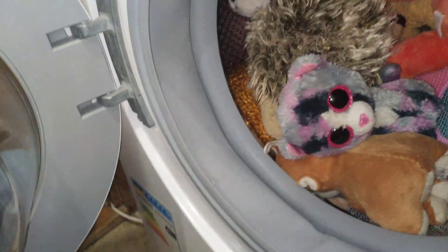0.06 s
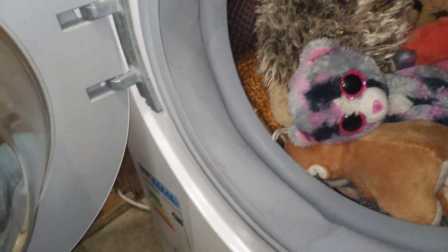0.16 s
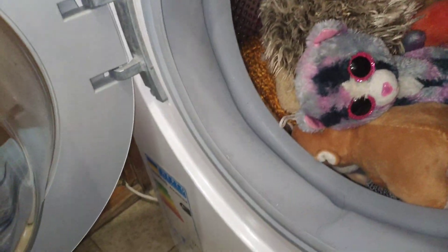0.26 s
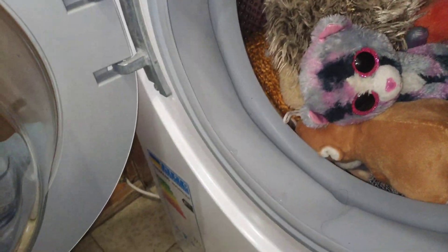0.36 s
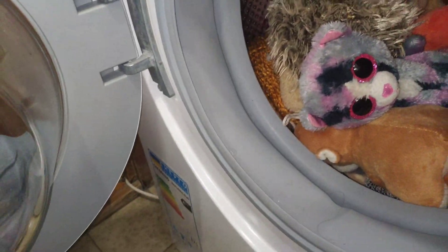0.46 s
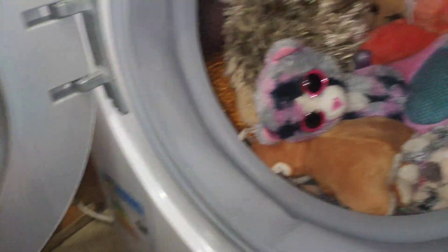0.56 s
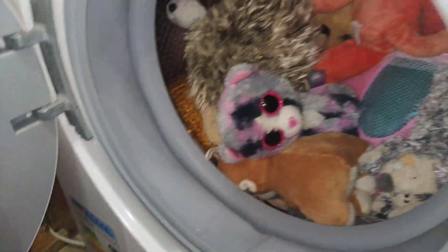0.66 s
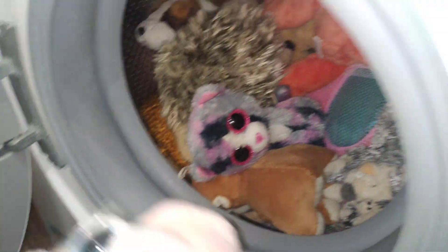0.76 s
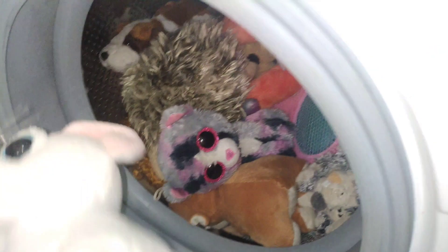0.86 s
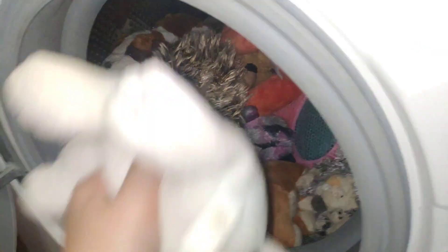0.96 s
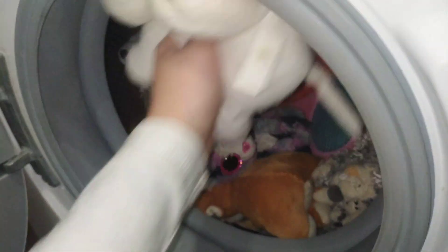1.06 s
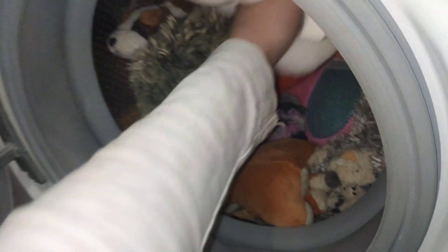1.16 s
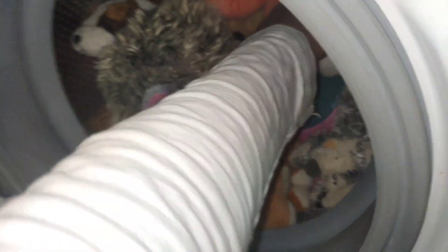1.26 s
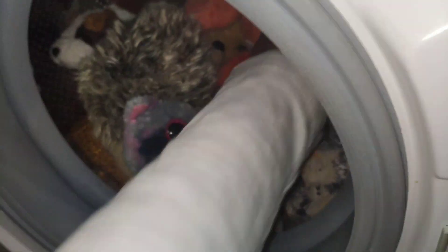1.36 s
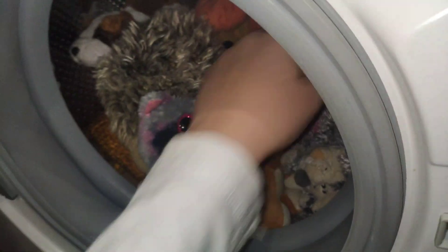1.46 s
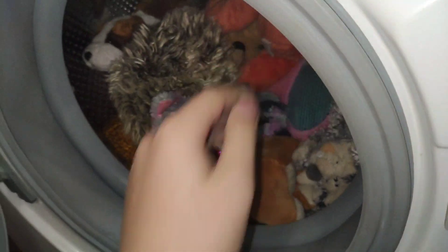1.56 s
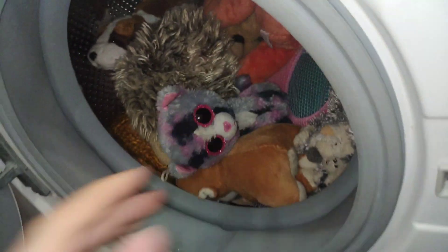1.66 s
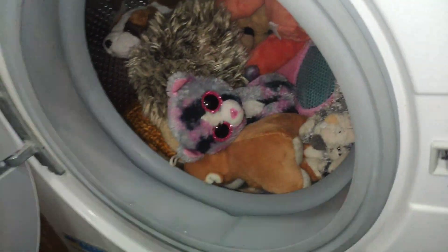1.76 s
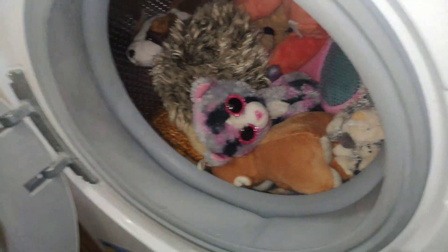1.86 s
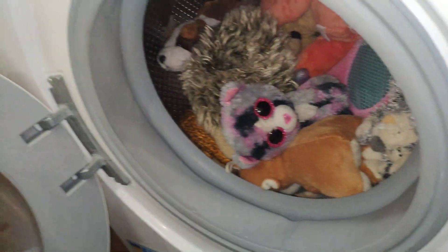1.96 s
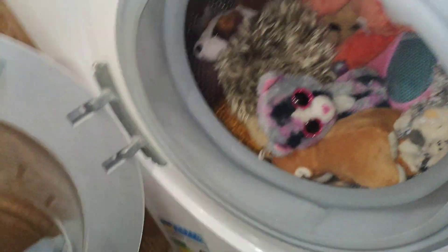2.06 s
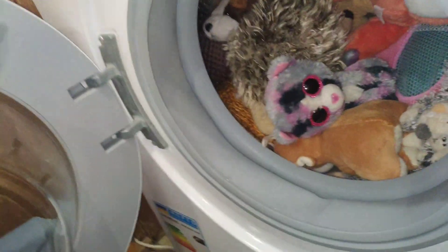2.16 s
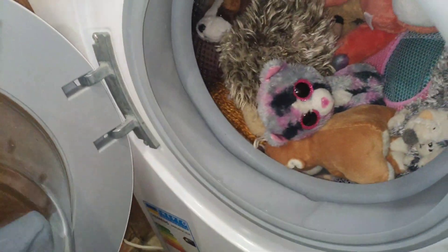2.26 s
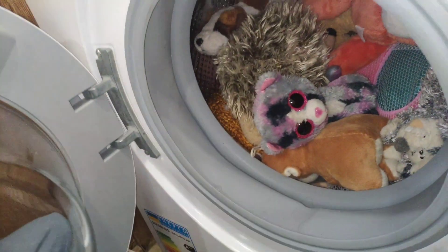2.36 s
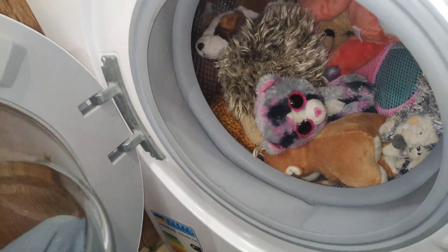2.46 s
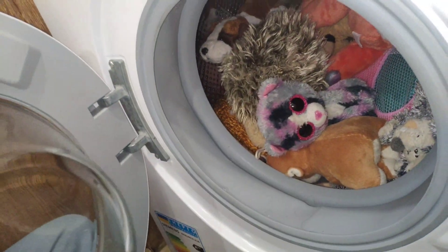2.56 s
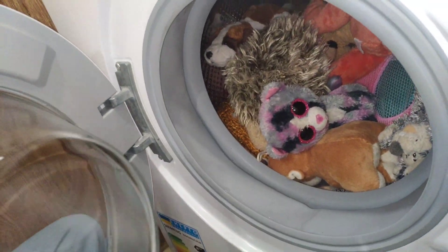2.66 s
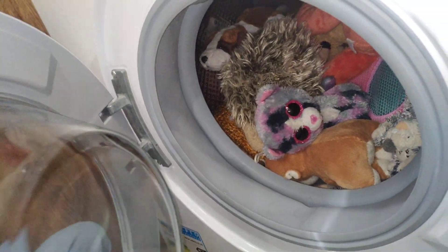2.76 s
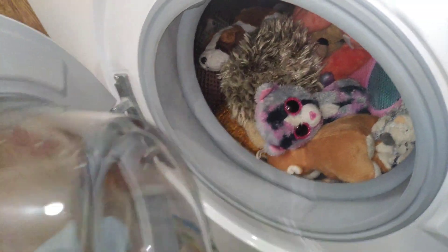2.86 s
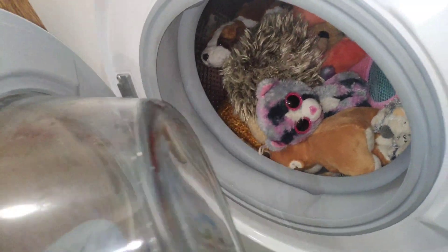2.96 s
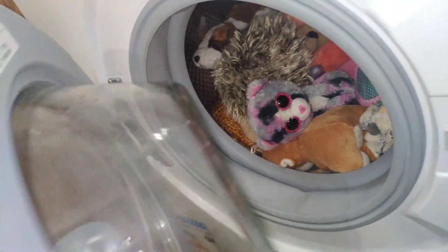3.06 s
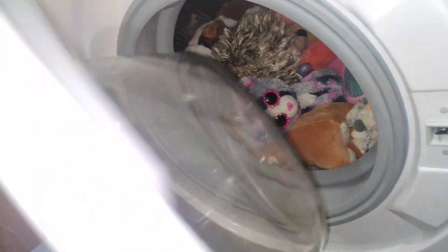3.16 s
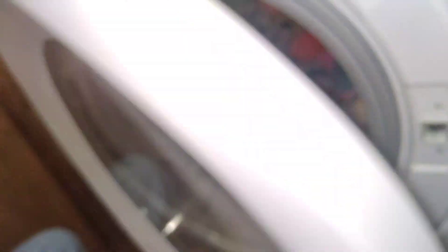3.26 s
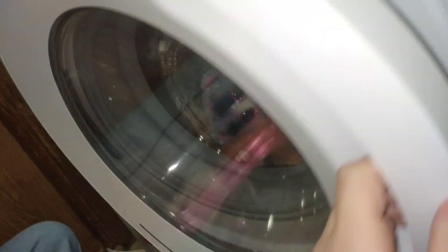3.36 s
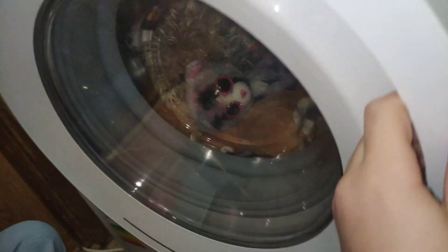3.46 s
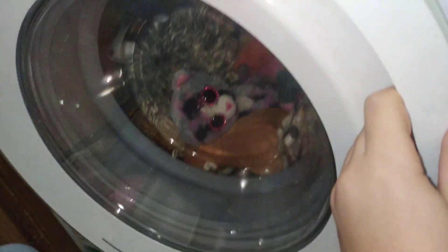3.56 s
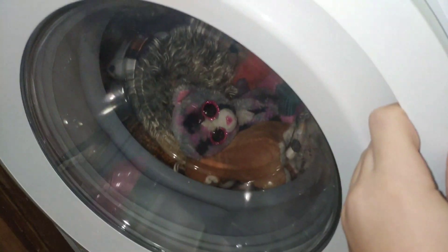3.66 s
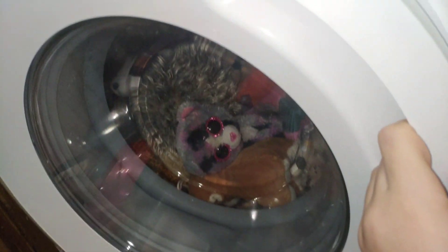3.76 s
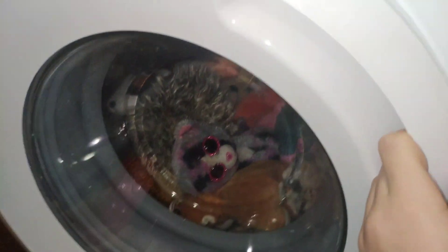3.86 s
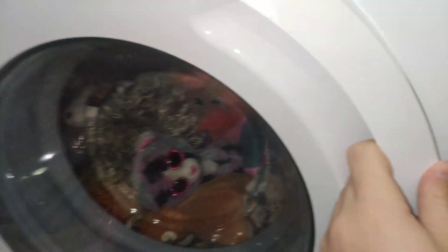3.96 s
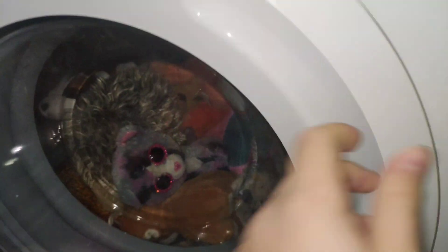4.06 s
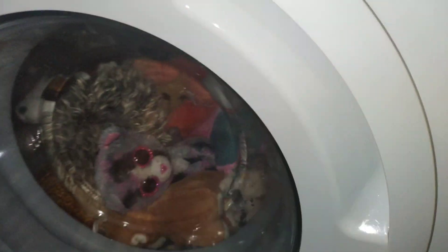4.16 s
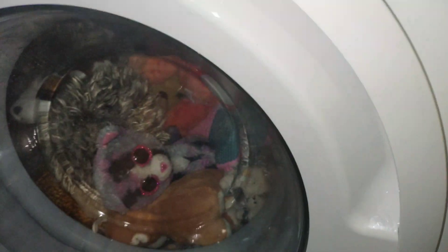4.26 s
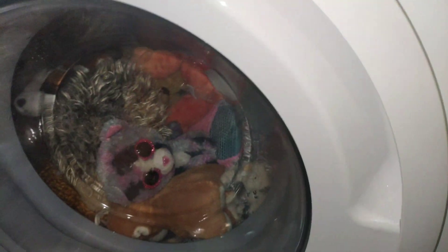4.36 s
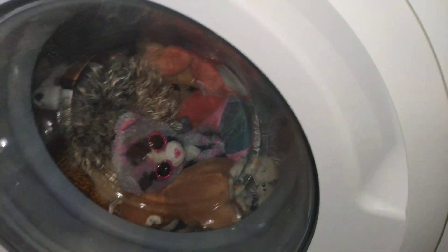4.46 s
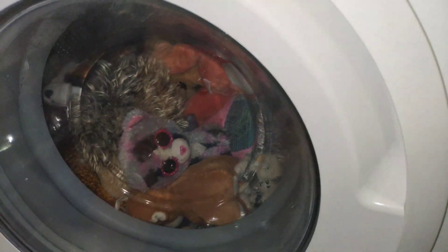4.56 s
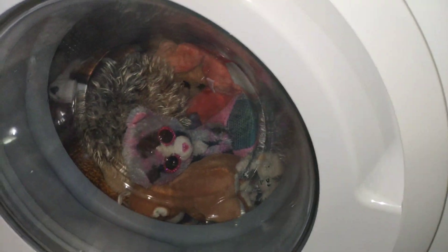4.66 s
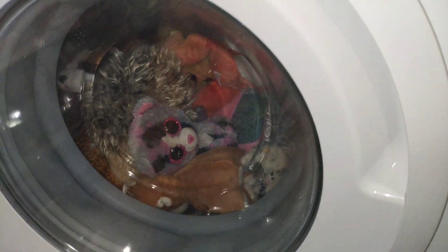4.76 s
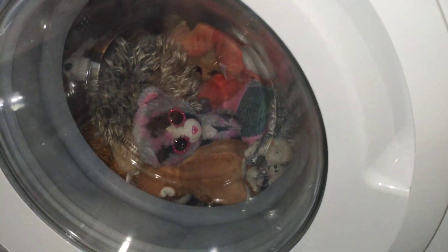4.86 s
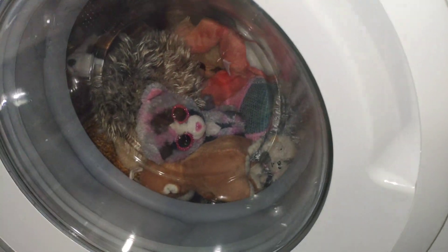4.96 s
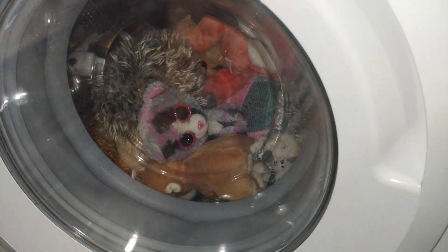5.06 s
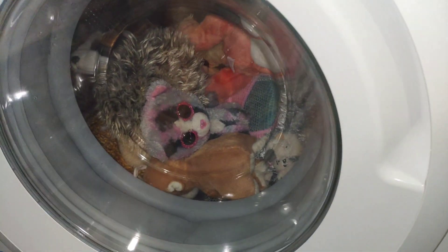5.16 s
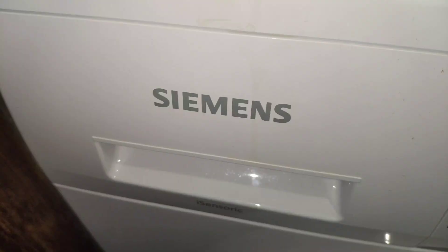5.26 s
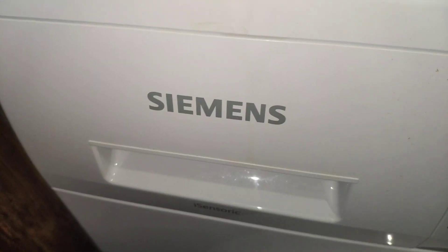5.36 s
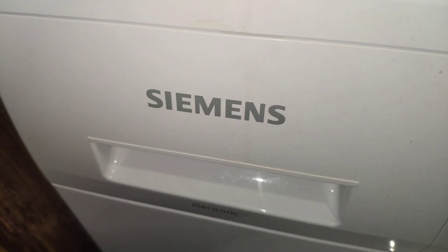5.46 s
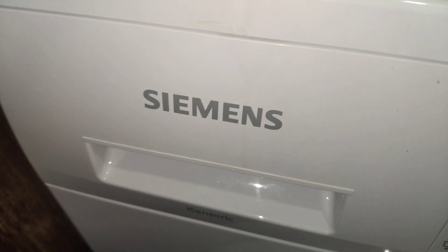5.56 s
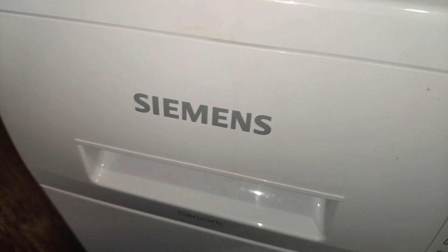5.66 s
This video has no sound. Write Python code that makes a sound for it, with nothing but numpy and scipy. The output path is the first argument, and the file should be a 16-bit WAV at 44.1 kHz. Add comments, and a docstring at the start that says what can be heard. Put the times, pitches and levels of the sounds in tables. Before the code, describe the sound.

An arm stuffs plush toys into a washer drum: quiet rustling, light taps and a short rough scrape. After a hinge click and soft hollow rubbing, the door strikes in two quick steps, snaps metallically and shakes the cabinet. Minor plastic clicks fade into thin room hiss. Phone handling ticks sit close on the right, ending with a strong pop.

```python
"""A washing machine's door swings shut: it bumps on its rubber seal, the latch snaps and the cabinet booms.
Contacts are short coloured noise bursts with damped modes; door and cabinet ring as modes, panels as noise.
Soft toys are loaded first; sleeves and cloth rustle as granular friction noise that follows the arm.
Fingers tick and thump on a hand-held phone, strongest at its right microphone, as cusps of pressure.
A quiet room answers the hard contacts and adds its air noise; the phone's electronics whine thinly."""
import sys
import numpy as np
from scipy import signal
from scipy.fft import rfft, irfft, next_fast_len
from scipy.io import wavfile
from scipy.ndimage import map_coordinates

SR = 44100
rng = np.random.default_rng(int(sys.argv[2]) if len(sys.argv) > 2 else 0)


def log_audio(samples):
    """Write samples as a 16-bit WAV file to the path given in sys.argv[1]."""
    # one column per channel
    frames = np.atleast_2d(samples).T
    # limit to full scale, then quantise
    limited = np.clip(frames, -1, 1)
    pcm = np.round(limited * 32767).astype(np.int16)
    wavfile.write(sys.argv[1], SR, pcm)


N = 251370  # samples, 5.7 s

# All levels are relative: they are set before the room, the microphone balance and the phone's response.
# Hard contacts of door and latch. Each row: start in seconds, level in dB, treble tilt in dB per octave,
# body resonance in Hz, body boost in dB.
CLACKS = [(2.8005, -34.5, -2.5, 686, 22), (2.823, -29, 0.5, 693, 25.5), (2.845, -42, -1, 800, 12),
          (3.582, -35, 5, 3280, 7.5), (3.6037, -16.5, -1.5, 1397, 2), (3.607, -20.5, -1.5, 2304, 8),
          (3.844, -33.5, -2, 951, 10), (3.8484, -17.5, -1.5, 950, 16), (3.868, -22.5, -1, 1000, 1),
          (3.889, -11.5, 4.5, 7130, 3.5), (3.897, -11, 2.5, 1500, 1), (3.9105, -14, -3, 2204, 2),
          (4.037, -27, 1.5, 2394, 9.5), (4.0625, -28, 0, 1700, 11), (4.082, -35.5, -6, 2100, 7)]
# Clear taps of the hand on the plastic rim. Each row: start in seconds, level in dB.
TOUCHES = [(1.596, -46), (1.645, -37.5), (1.949, -45), (2.09, -43), (2.162, -45.5), (2.389, -42.5),
           (2.525, -43.5), (2.54, -43.5), (3.008, -46), (3.0767, -48), (4.32, -47), (4.677, -48),
           (4.78, -52), (4.85, -52.5)]
# The door's weight landing. Each row: start in seconds, then door, cabinet and panel shudder levels in dB.
THUDS = [(3.604, -23, -51.5, -31), (3.628, -42, -43.5, -31), (3.846, -27.5, -37.5, -27.5),
         (3.868, -40.5, -42, -26.5), (3.9107, -30.5, -13, -16)]
# Modes of the glass door on its rubber seal. Each row: frequency in Hz, level in dB, t60 in seconds.
DOOR_MODES = [(77.8, 1, 0.63), (155, -5, .3), (165, -7, 0.67), (228, -15.5, 0.3), (356, -11.5, 0.33),
              (387, -9.5, 0.28)]
# Modes of the steel cabinet and drum. Each row: frequency in Hz, level in dB, t60 in seconds.
CABINET_MODES = [(60.06, -13.5, .45), (100, -21.5, 0.48), (159.9, -4.5, 0.38), (194.4, -2, 0.39),
                 (241.4, -4.5, .22), (262.5, -4, 0.31), (283, -7.5, 0.14), (331.4, -13, .25),
                 (379, -12, .25), (423, -14.5, 0.33), (468, -21, 0.22)]
# Modes of the plastic door frame. Each row: frequency in Hz, level in dB, t60 in seconds.
FRAME_MODES = [(947, -11, 0.085), (1070, -12.5, .13), (1364, -8, 0.046), (1630, -11, .12), (1744, -9.5, .1),
               (2006, -5, 0.16), (2120, -3, 0.1), (2230, 1, .13), (2500, -8, 0.045), (2640, -9.5, 0.14),
               (2820, -8.5, 0.093), (3712, -12, .09)]
# Modes of the metal catch. Each row: frequency in Hz, level in dB, t60 in seconds.
LATCH_MODES = [(4584, -7.5, 0.18), (5050, -7, 0.09), (5529, -8.5, 0.16), (7120, -2, 0.14),
               (7574, -1, 0.084), (8210, -8.5, 0.17), (8624, -10.5, 0.15)]
# The catch springs home: start in seconds, level in dB.
LATCH_SNAP = (3.888, -27)
# Fingers shifting on the phone. Each row: time in seconds, level in dB, length of the push in seconds,
# distance in seconds, before or after, at which the stutter has lost 6 dB.
FINGERS = [(0.094, -31.5, 0.00007, 0.002), (0.1122, -22.5, 0.00026, 0.016), (0.4273, -32.5, 0.00025, 0.002),
           (0.618, -26.5, 0.00038, 0.025), (1.89, -27, 0.00036, 0.014), (2.228, -32.5, 0.000083, 0.0098),
           (3.036, -30, 0.0015, 0.0018), (3.3959, -30, 0.00012, 0.002), (3.432, -26.5, 0.00013, 0.014),
           (3.4583, -20.5, 0.00012, 0.025), (4.174, -26, 0.00099, 0.015), (5.286, -40.5, 0.00092, 0.005),
           (5.416, -34.5, 0.00085, 0.0021), (5.481, -35, 0.00056, 0.0048), (5.5636, -1, 0.0007, 0.012),
           (5.648, -41.5, 0.0012, 0.012)]
# Sharp ticks of the phone case. Each row: start in seconds, level in dB, frequency in Hz.
TICKS = [(2.1857, -23.5, 3020), (2.1938, -36, 3080), (2.217, -33, 2440), (3.2969, -24.5, 1990),
         (5.563, -37, 11500), (5.6214, -43.5, 2940), (5.6466, -38.5, 2460)]

# Spectra of the contacts and of each friction or noise layer. Each row: frequency in Hz, level in dB per Hz.
CLACK_TONE = [(100, -25.5), (300, -8), (600, -12.5), (950, -4), (1550, -3.5), (2200, 3), (3100, -7.5),
              (4000, -10.5), (5100, -7), (6700, -26.5), (7700, -16), (9600, -37), (13000, -26),
              (15000, -41)]
RUSTLE_TONE = [(200, -33), (500, -7), (850, -11.5), (1300, -13), (1800, -7), (2180, 0), (2800, -8),
               (3800, -7.5), (5500, -11.5), (7500, -19.5), (9500, -25.5), (13000, -24), (15000, -35.5)]
SCRAPE_TONE = [(60, -27), (110, -16), (170, 3), (260, -2.5), (380, -3), (600, -10.5), (1000, -8),
               (1400, -4), (2050, 4.5), (2900, -4.5), (4800, -5.5), (7000, -15), (10000, -22.5),
               (14000, -29)]
HOLLOW_TONE = [(90, -25), (170, -6.5), (250, 1.5), (380, -2), (520, -13), (800, -9), (1400, -12.5),
               (3000, -50.5)]
RUMBLE_TONE = [(15, -5.5), (50, -1.5), (80, 1.5), (115, -3), (170, -0.5), (300, -22), (800, -57)]
PANEL_TONE = [(25, -19), (60, -8), (120, -11.5), (160, -1), (265, 1.5), (320, -8), (400, -13.5), (600, -19),
              (1500, -43)]
FLOOR_TONE = [(15, -33), (25, 4), (363, -9.5), (404, -16), (811, -17), (1150, -20), (2300, -13.5),
              (8100, -33), (12100, -29), (13100, -15.5), (15000, -39.5)]
GRIP_TONE = [(20, 6.5), (50, -2.5), (100, -0.5), (200, -7), (450, -18), (800, -19.5), (1500, -21),
             (2200, -25), (4000, -33), (7000, -43), (14000, -49)]

# Decay of the room. Each row: frequency in Hz, t60 in seconds.
ROOM_T60 = [(100, 0.51), (400, 0.91), (1500, 0.29), (5000, 0.3), (13000, 0.086)]
# Correlation of the two channels. Each row: frequency in Hz, left-right likeness from 0 to 1.
LIKENESS = [(100, 0.37), (300, 0.85), (700, 0.57), (2000, 0.34), (12000, 0.21)]
# Balance of the microphones. Each row: frequency in Hz, left minus right in dB.
BALANCE_DB = [(80, -3), (250, -3), (600, -3.5), (1200, -6), (2150, -15.5), (3200, -9), (5000, -5.5),
              (8000, -1), (12500, -8)]

# Cloth and skin dragged over the machine. Each row: peak time in seconds, level in dB, resonance in Hz,
# standard deviation of the swell in seconds.
RUBS = [(0.763, -52, 1180, 0.0088), (0.764, -51, 5870, 0.013), (0.993, -56.5, 563, 0.041),
        (1.206, -47.5, 1310, 0.015), (1.208, -51, 850, 0.014), (1.255, -48.5, 230, 0.058),
        (2.119, -52, 223, 0.033), (2.411, -52.5, 245, 0.035), (2.419, -56, 2200, 0.03),
        (2.569, -49.5, 2040, 0.054), (2.708, -48, 350, 0.026), (2.864, -45, 243, 0.026),
        (2.87, -50, 594, 0.046), (2.941, -47, 402, 0.03), (3.017, -53, 5800, 0.0057),
        (3.167, -46, 370, 0.027), (3.842, -37, 296, 0.0069), (5.3, -55, 276, 0.022)]
# The sleeve drags over the rim, then the cuff. Each row: start in seconds, hold in seconds, level in dB.
SCRAPES = [(1.642, 0.061, -29), (1.801, 0.051, -44)]
# The door turns on its hinge: start in seconds, hold in seconds, level in dB.
SWING = (2.62, 0.9, -53.5)
# The rubber seal is compressed: start in seconds, hold in seconds, level in dB.
SQUEEZE = (3.63, 0.19, -46.5)
# The grip tightens on the phone: start in seconds, hold in seconds, level in dB.
PALM = (5.21, 0.42, -50)
# Soft pushes that stir the drum. Each row: peak time in seconds, level in dB, standard deviation in seconds.
BUMPS = [(1.143, -55.5, 0.019), (1.252, -49, 0.052), (1.67, -52, 0.024), (1.977, -52.5, 0.022),
         (2.1, -59, 0.053), (3.5, -57.5, 0.076), (4.34, -50, 0.059), (4.681, -68, 0.148)]

# The arm's movement while loading the toys. Each row: time in seconds, movement level in dB.
LOADING = [(0.0, -61.0), (0.12, -60.0), (0.32, -77.5), (0.63, -54.5), (0.88, -59), (1.01, -51.5),
           (1.11, -60), (1.24, -52.5), (1.62, -63.5)]
# Reaching for the door and swinging it. Each row: time in seconds, movement level in dB.
REACHING = [(1.95, -63), (2.07, -66), (2.18, -61), (2.31, -66.5), (2.55, -57.0), (2.95, -63.5),
            (3.35, -62.0), (3.57, -57)]
# Letting go. Each row: time in seconds, movement level in dB.
LETTING_GO = [(4.17, -62.5), (4.55, -67), (4.85, -68), (5.0, -86), (5.22, -82.5)]

RUSTLE_DB, HOLLOW_DB, RUMBLE_DB = 5, -4, -7  # each cloth layer, relative to the movement that drives it
REST_DB, LOW_SWING = -60, 0.57  # about this level the low layers' dB swing is this share of the rustle's
FLUTTER_DB, FLUTTER_PER_S = 1.1, 30
CLACK_T60_S, FRAME_DB = 0.062, -15.5  # decay of a contact; ring of the frame relative to it
RATTLE_DB, RATTLE_PER_S = 1.5, 300  # loose parts chatter unevenly while a contact dies away
SCRAPE_ATTACK_S, SCRAPE_T60_S = 0.021, 0.2
BRUSH_PER_S, BRUSH_DB, BRUSH_SCATTER_DB = 9, 4.5, 2  # mean rate; level relative to the movement; its spread
STUTTER_GAP_S, STUTTER_DB, STUTTER_PUSH_S = 0.008, -34, 0.00035  # small stick-slips around each shift
TOP_HZ = 14200  # band limit of the phone


def amp(db):
    """An amplitude ratio is ten to the power of its decibels over twenty."""
    return 10 ** (np.asarray(db) / 20)


def unit(x):
    """Normalisation: the signal is scaled to an rms of 1."""
    return x / np.sqrt(np.mean(x ** 2) + 1e-20)


def along(points, hz):
    """Interpolation of (Hz, value) points on a logarithmic frequency axis."""
    f, v = np.transpose(points)
    return np.interp(np.log(hz + 1), np.log(f + 1), v)


def wobble(rate):
    """Random modulation: a smooth curve through rate independent normal values a second."""
    knots = rng.standard_normal(int(N * rate / SR) + 4)
    return map_coordinates(knots, [np.arange(N) * rate / SR])


def filtered(x, response):
    """Linear filtering: the spectrum is multiplied by a response of frequency."""
    n = x.shape[-1]
    m = next_fast_len(n + 8192)
    return irfft(rfft(x, m) * response(np.fft.rfftfreq(m, 1 / SR)), m)[..., :n]


def add(track, s, sound):
    """Superposition: a sound is summed into a track from s seconds on."""
    part = track[..., round(s * SR):][..., :sound.shape[-1]]
    part += sound[..., :part.shape[-1]]


def noise(size):
    """White noise: two uncorrelated normal sequences."""
    return rng.standard_normal((2, size))


def coloured(pair, tone, shade=lambda hz: 0):
    """Partial correlation: mid and side noise, weighted by LIKENESS, form a pair of rms 1 with this tone."""
    def response(hz):
        angle = np.arccos(np.clip(along(LIKENESS, hz), -1, 1)) / 2
        return amp(along(tone, hz) + shade(hz)) * [np.cos(angle), np.sin(angle)]

    mid, side = filtered(pair, response)
    return unit(np.array([mid + side, mid - side]))


def friction(tone, grain_db, rate):
    """Stick-slip friction: fibres catch and let go, giving noise in tiny bursts of uneven size."""
    return coloured(noise(N) * amp(grain_db * wobble(rate)), tone)


def ring(modes, t):
    """Modal synthesis: exponentially damped sines of alternating sign, their levels scattered by 1 dB."""
    out = np.zeros(len(t))
    for k, (hz, db, t60) in enumerate(modes):
        decay = amp(db + rng.normal() - 60 * t / t60)
        out += (-1) ** k * decay * np.sin(2 * np.pi * hz * t)
    return out


def hump(hz, centre_hz, octaves):
    """Broad resonance: a bell of height 1 on an octave axis."""
    return 1 / (1 + (np.log2((hz + 1) / centre_hz) / octaves) ** 2)


def crash(t, t60, tilt_db, body_hz=2000, body_db=0):
    """High modal density: the ring of dense plastic modes is decaying noise, brighter with a higher tilt."""
    def shade(hz):
        octave = np.log2(np.clip(hz, 400, 8000) / 2000)
        return tilt_db * octave + body_db * hump(hz, body_hz, octaves=0.39)

    return coloured(noise(len(t)), CLACK_TONE, shade) * amp(-60 * t / t60)


def gesture(start, hold, db, attack, t60):
    """Envelope of a movement: a quadratic rise, a hold and an exponential decay."""
    t = np.arange(N) / SR - start
    decay_db = -60 * np.maximum(t - attack - hold, 0) / t60
    return np.clip(t / attack, 0, 1) ** 2 * amp(db + decay_db)


def movement_db():
    """Common excitation: the level of the arm's movement at every sample."""
    s, db = np.transpose(np.vstack([LOADING, REACHING, LETTING_GO]))
    return np.interp(np.arange(N) / SR, s, db)


def floor(whine_hz=13270, width_hz=70):
    """Stationary noise: quiet room air, and the thin whine of the phone's electronics as a narrow band."""
    whine = unit(filtered(noise(N), lambda hz: np.exp(-((hz - whine_hz) / width_hz) ** 2)))
    return amp(-76.0) * coloured(noise(N), FLOOR_TONE) + amp(-82.5) * whine


def cloth():
    """Friction follows motion: sleeves and plush rustle, rub hollowly on the machine and stir its drum."""
    level_db, t = movement_db(), np.arange(N) / SR
    rustle_gain = amp(level_db + RUSTLE_DB + FLUTTER_DB * wobble(FLUTTER_PER_S))
    rustle = rustle_gain * friction(RUSTLE_TONE, grain_db=2.0, rate=700)
    low_db = REST_DB + LOW_SWING * (level_db - REST_DB)
    hollow_gain = amp(low_db + HOLLOW_DB + FLUTTER_DB * wobble(8.4))
    hollow = hollow_gain * friction(HOLLOW_TONE, grain_db=1.0, rate=100)
    pushes = sum(amp(db) * np.exp(-((t - s) / length) ** 2 / 2) for s, db, length in BUMPS)
    rumble = (amp(low_db + RUMBLE_DB) + pushes) * coloured(noise(N), RUMBLE_TONE)
    return rustle + hollow + rumble


def brushes(count=60):
    """Random impacts: folds and fingertips flick the rim, as strongly as the arm's movement allows."""
    out, t, level_db = np.zeros((2, N)), np.arange(SR // 12) / SR, movement_db()
    times = np.cumsum(rng.uniform(0.2, 1.8, count)) / BRUSH_PER_S
    for s, scatter in zip(times, rng.standard_normal(count)):
        if s < N / SR:
            db = level_db[int(s * SR)] + BRUSH_DB + BRUSH_SCATTER_DB * scatter
            add(out, s, amp(db) * crash(t, t60=0.043, tilt_db=2.5))
    return out


def slips():
    """Stick-slip: yields (s, dB, push length s) of each finger shift and its fading stutter on both sides."""
    steps = np.array([-3, -2, -1, 1, 2, 3])
    for s, db, length, stutter in FINGERS:
        yield s, db, length
        for step, (late, loud, long) in zip(steps, rng.standard_normal((len(steps), 3))):
            offset = STUTTER_GAP_S * (step + 0.202 * late)
            slip_db = STUTTER_DB + 1.9 * loud - 6 * (offset / stutter) ** 2
            yield s + offset, slip_db, STUTTER_PUSH_S * np.exp(.5 * long)


def handling(rebound=0.76, lag=0.0012, soft_hz=560, low_cut_hz=70):
    """Pressure and recoil: each slip is a cusp, followed after lag seconds by the case's softer rebound."""
    pushes, ticks, t = np.zeros(N), np.zeros(N), np.arange(SR // 25) / SR
    lead = t[len(t) // 2]
    for s, db, length in slips():
        add(pushes, s - lead, -amp(db) * np.exp(-np.abs(t - lead) / length))
    for s, db, hz in TICKS:
        shell = np.sin(2 * np.pi * hz * t) * np.exp(-t * hz / 1.77)
        click = 0.18 * rng.standard_normal(len(t)) * np.exp(-t / 0.00012)
        add(ticks, s, amp(db) * (shell + click))

    def case(hz):
        recoil = rebound * np.exp(-2j * np.pi * hz * lag - (hz / soft_hz) ** 2)
        return (1 - recoil) * hz / (hz - 1j * low_cut_hz)

    return (filtered(pushes, case) + ticks) * np.array([[.02], [2]])  # left, right gain


def rubs(boost_db=30, octaves=.6):
    """Resonant friction: each stroke swells and fades, sounding one resonance of the door or drum."""
    out, t = np.zeros((2, N)), np.arange(SR // 2) / SR
    lead = t[len(t) // 2]
    for s, db, centre_hz, length in RUBS:
        shade = lambda hz: boost_db * hump(hz, centre_hz, octaves)
        stroke = coloured(noise(len(t)), [(300, -2.5), (10000, -19.5)], shade)
        add(out, s - lead, amp(db) * stroke * np.exp(-((t - lead) / length) ** 2 / 2))
    return out


def contacts():
    """Impact excitation: the hand taps the rim; door and latch strike, ringing frame and catch."""
    out, t = np.zeros((2, N)), np.arange(SR // 3) / SR
    for s, db, tilt_db, body_hz, body_db in CLACKS:
        burst = crash(t, CLACK_T60_S, tilt_db, body_hz, body_db)
        add(out, s, amp(db) * (burst + amp(FRAME_DB) * ring(FRAME_MODES, t)))
    for s, db in TOUCHES:
        add(out, s, amp(db) * crash(t, t60=0.053, tilt_db=-1.3))
    s, db = LATCH_SNAP
    add(out, s, amp(db) * ring(LATCH_MODES, t))
    return out * amp(RATTLE_DB * wobble(RATTLE_PER_S))


def scrape():
    """Sliding friction: a sleeve, then its cuff, drags briskly over the rim of the opening."""
    drag = sum(gesture(s, hold, db, SCRAPE_ATTACK_S, SCRAPE_T60_S) for s, hold, db in SCRAPES)
    return drag * friction(SCRAPE_TONE, grain_db=2.0, rate=780)


def swing():
    """Friction of a joint: the door rubs hollowly as it turns, then its seal creaks under the hand."""
    hinge = gesture(*SWING, attack=0.053, t60=0.98) * friction(HOLLOW_TONE, grain_db=2, rate=110)
    seal = friction(RUSTLE_TONE, grain_db=3.5, rate=400)
    seal = seal + amp(-3) * friction(HOLLOW_TONE, grain_db=2.5, rate=86)
    return hinge + gesture(*SQUEEZE, attack=0.03, t60=0.15) * seal


def thuds():
    """Coupled vibration: the door bounces on its seal and shakes the cabinet, which builds up more slowly."""
    out, t = np.zeros((2, N)), np.arange(SR) / SR
    for s, door_db, cabinet_db, panel_db in THUDS:
        door = amp(door_db) * ring(DOOR_MODES, t)
        cabinet = amp(cabinet_db) * ring(CABINET_MODES, t) * (1 - np.exp(-t / 0.014))
        panels = amp(panel_db - 60 * t / 0.22) * coloured(noise(len(t)), PANEL_TONE)
        add(out, s, (door + cabinet + panels) * (1 - np.exp(-t / 0.0013)))
    return out


def grip():
    """Contact friction: the palm shifts on the phone, mostly beside the right microphone."""
    shift = gesture(*PALM, attack=0.08, t60=0.18) * friction(GRIP_TONE, grain_db=2, rate=260)
    return shift * amp([[-11], [4]])  # left, right gain in dB


def room(x):
    """Reverberation: convolution with noise in which each frequency decays at its own speed."""
    hz, t, z = signal.stft(noise(SR // 2), SR, nperseg=256)
    decay = amp(-60 * t / along(ROOM_T60, hz)[:, None])
    tail = signal.istft(z * decay, SR, nperseg=256)[1]
    delayed = np.pad(x, ((0, 0), (300, 0)))  # samples before the first answer
    return signal.fftconvolve(delayed, tail / np.linalg.norm(tail[0]), axes=1)[:, :N]


def scene(lag=.00005):
    """Time and level difference: airborne sound is earlier and stronger at the right, most near 2 kHz."""
    hard = contacts() + scrape() + brushes()
    air = hard + amp(-10) * room(hard) + thuds() + cloth() + swing() + rubs() + floor()

    def ports(hz):
        ratio = amp(along(BALANCE_DB, hz))  # left over right
        left = ratio * np.exp(-2j * np.pi * hz * lag)
        return 2 * np.array([left, np.ones_like(hz)]) / (1 + ratio)

    return filtered(air, ports) + handling() + grip()


def record(dry, top=0.82):
    """Saturation and band limiting: the phone rounds off the highest peaks and cuts steeply at TOP_HZ."""
    held = dry / (1 + np.abs(dry / top) ** 8) ** (1 / 8)
    return filtered(held, lambda hz: 1 / (1 + (hz / TOP_HZ) ** 70))


dry = scene()
out = record(dry)
log_audio(out)
```